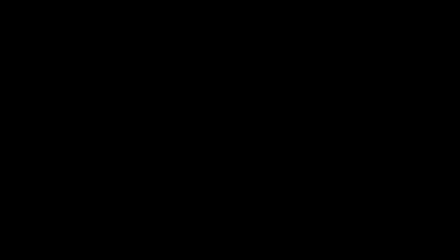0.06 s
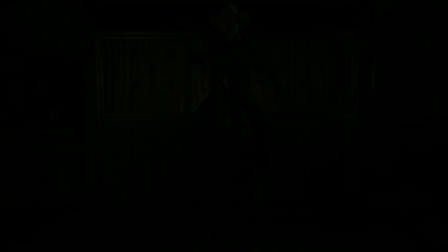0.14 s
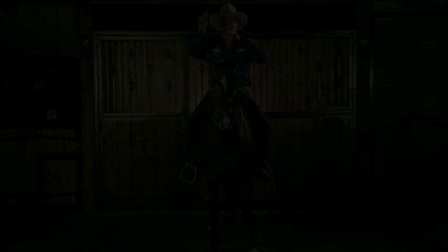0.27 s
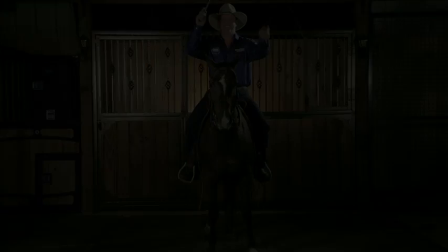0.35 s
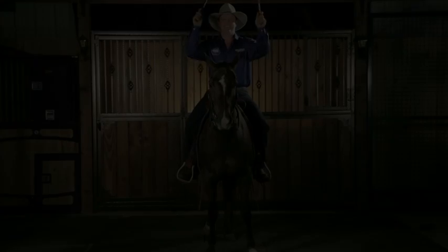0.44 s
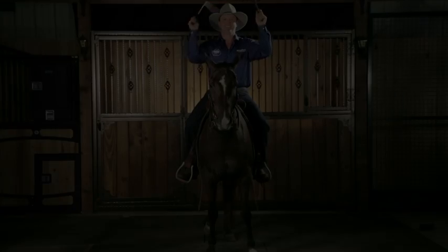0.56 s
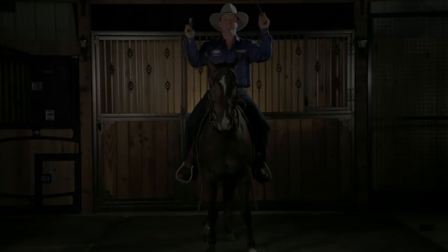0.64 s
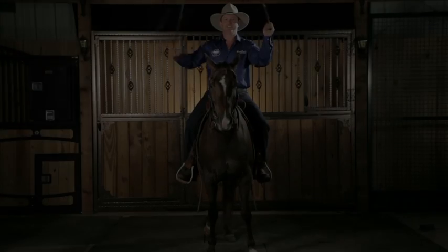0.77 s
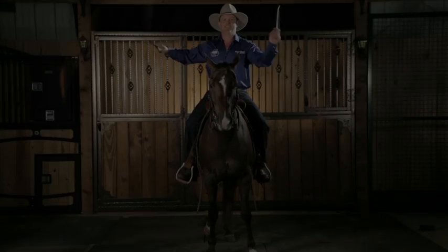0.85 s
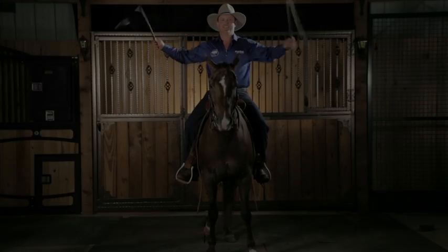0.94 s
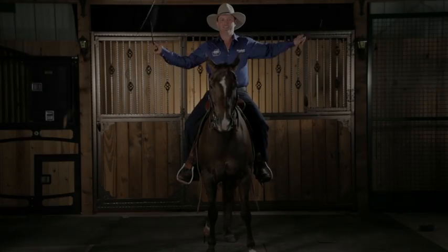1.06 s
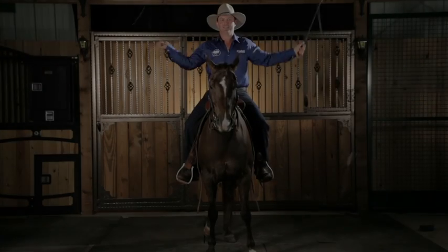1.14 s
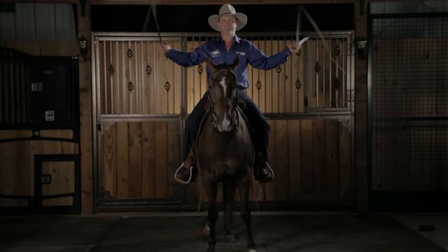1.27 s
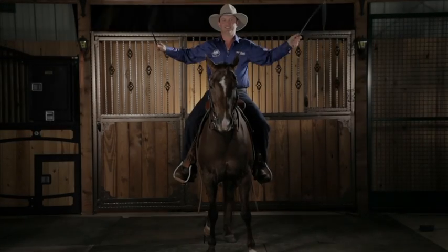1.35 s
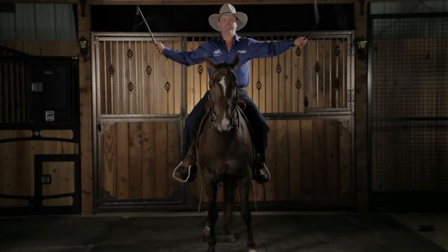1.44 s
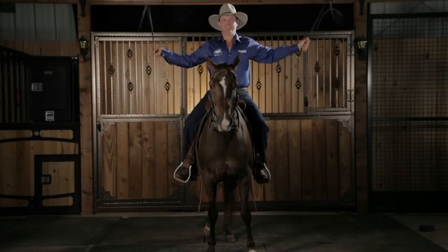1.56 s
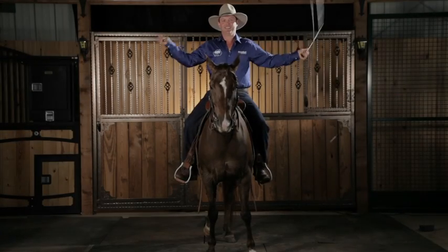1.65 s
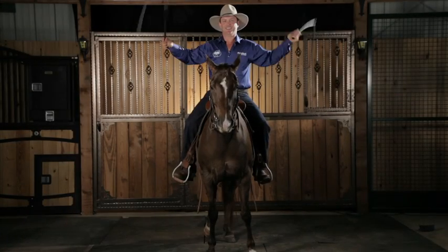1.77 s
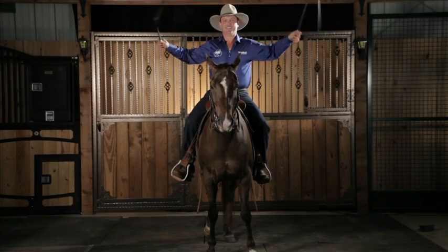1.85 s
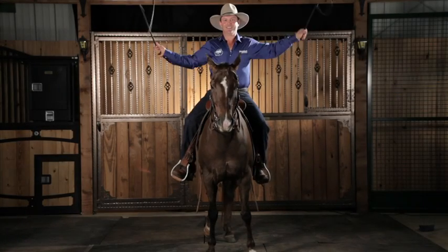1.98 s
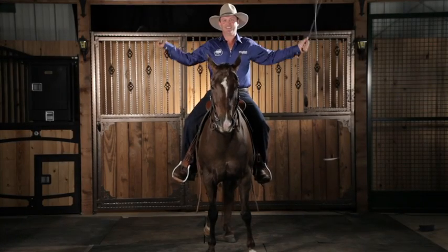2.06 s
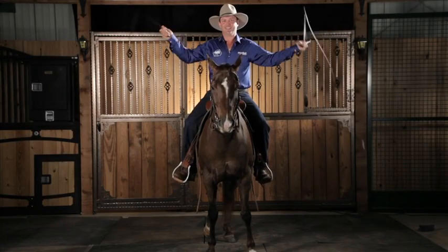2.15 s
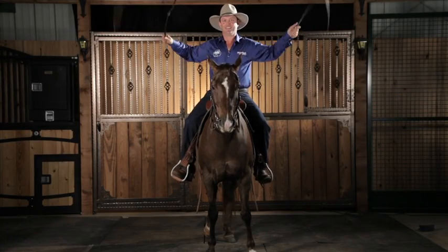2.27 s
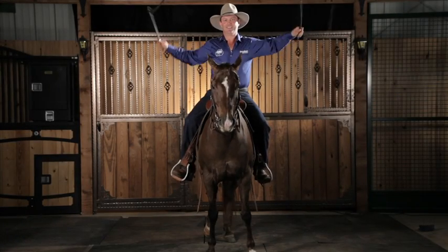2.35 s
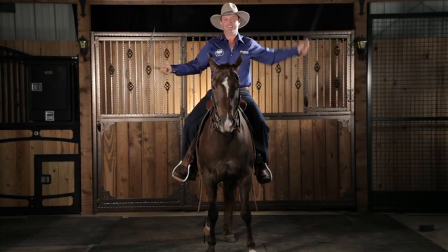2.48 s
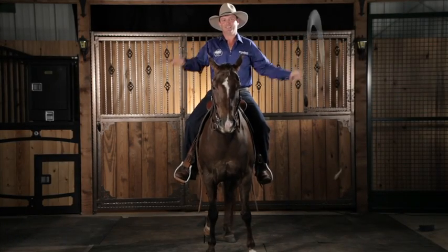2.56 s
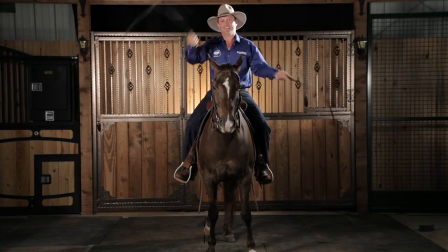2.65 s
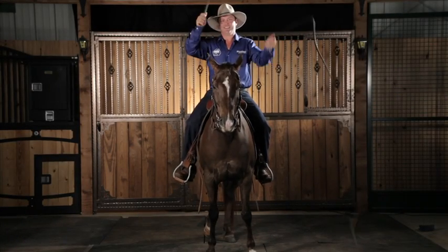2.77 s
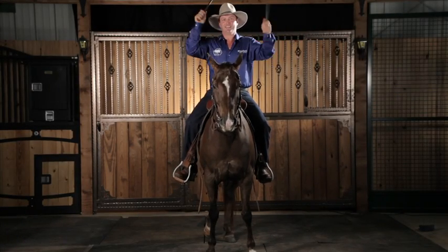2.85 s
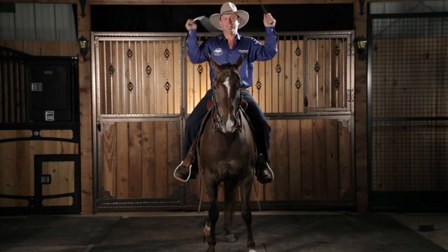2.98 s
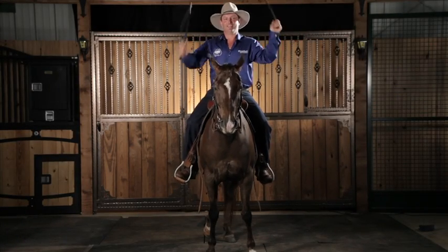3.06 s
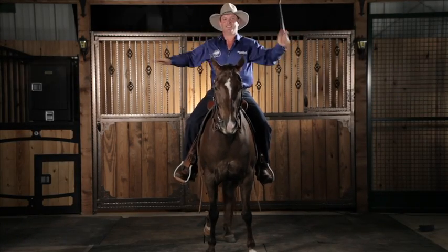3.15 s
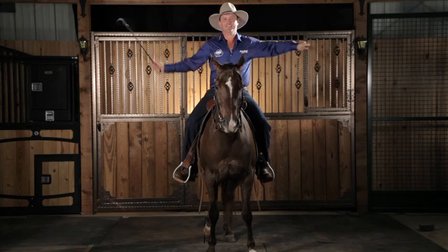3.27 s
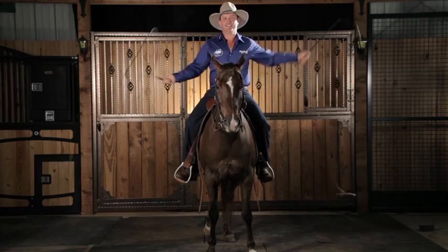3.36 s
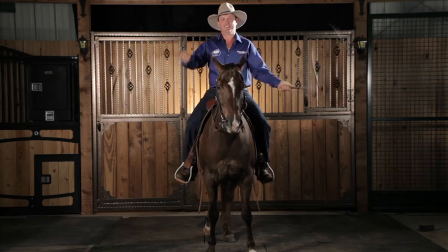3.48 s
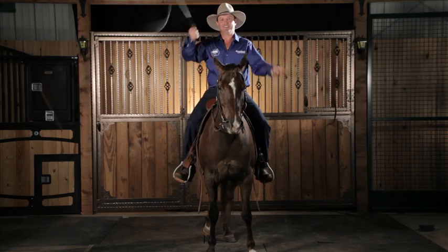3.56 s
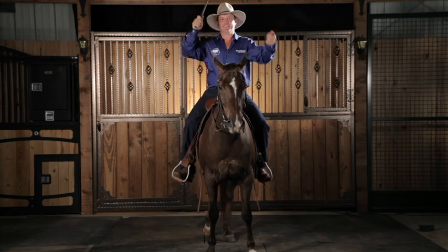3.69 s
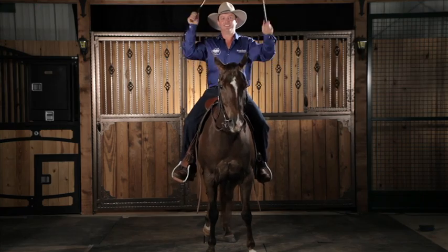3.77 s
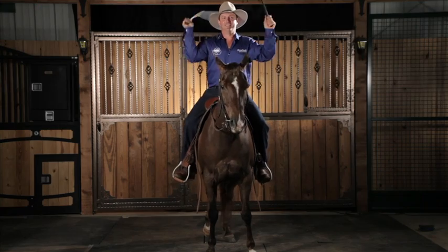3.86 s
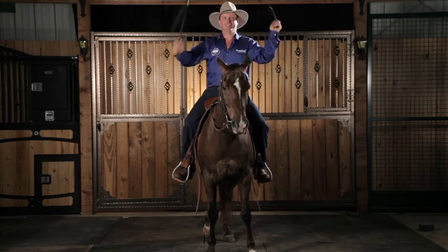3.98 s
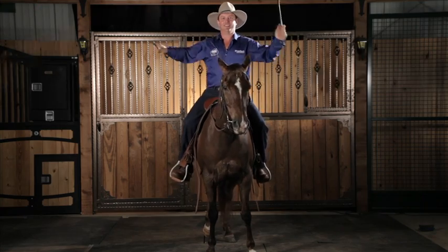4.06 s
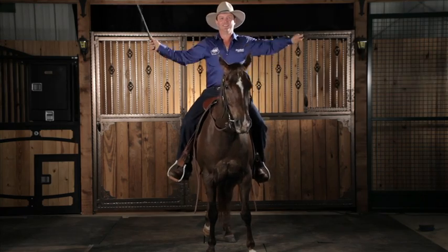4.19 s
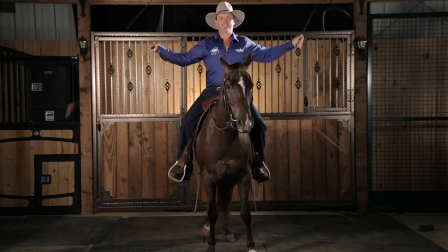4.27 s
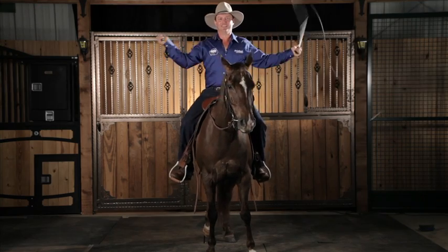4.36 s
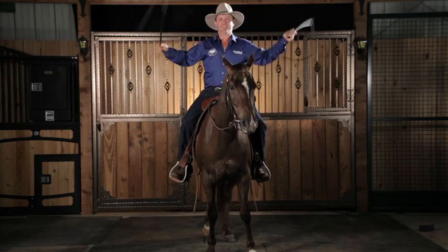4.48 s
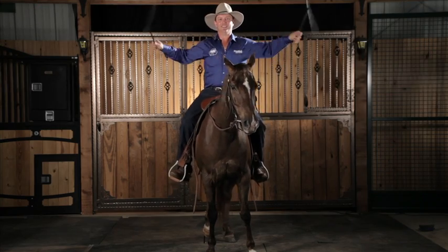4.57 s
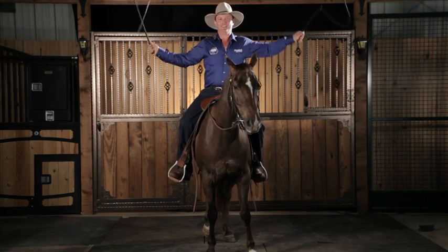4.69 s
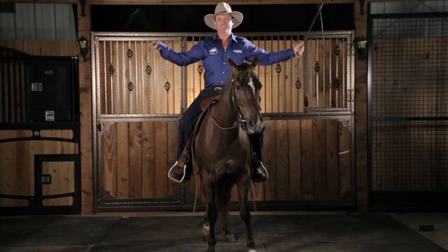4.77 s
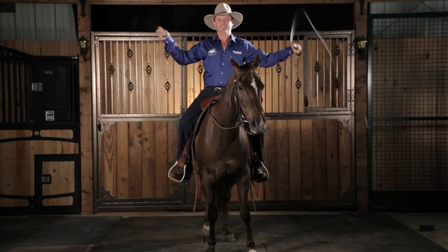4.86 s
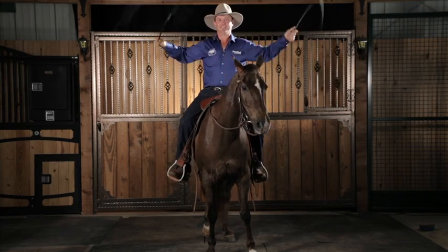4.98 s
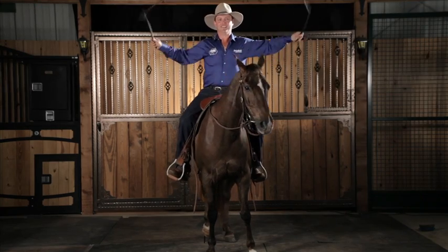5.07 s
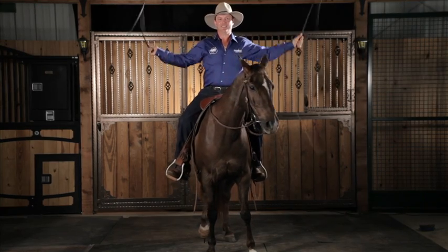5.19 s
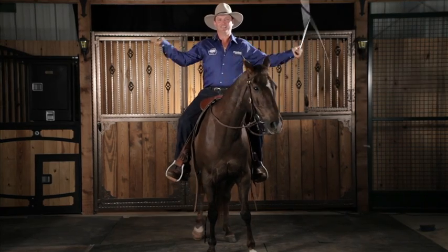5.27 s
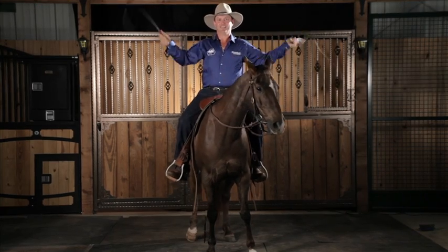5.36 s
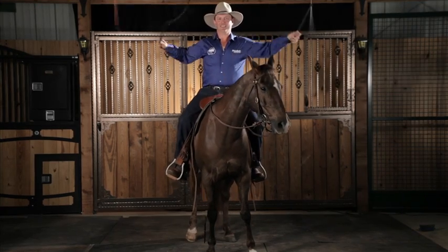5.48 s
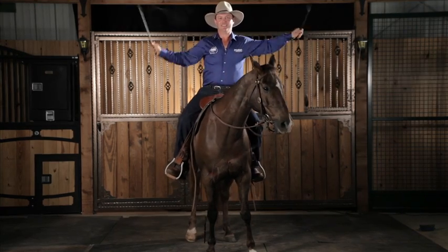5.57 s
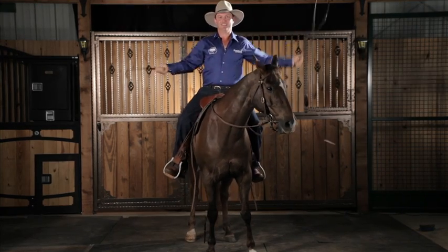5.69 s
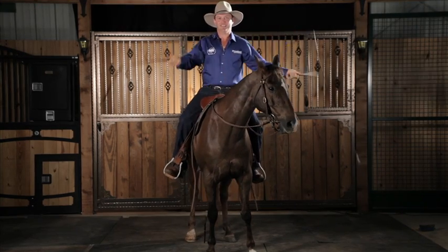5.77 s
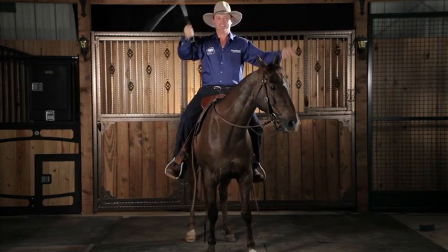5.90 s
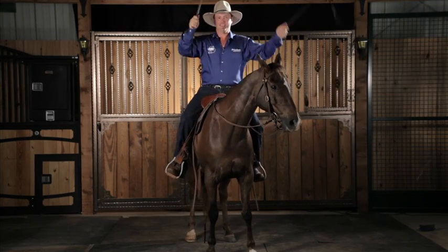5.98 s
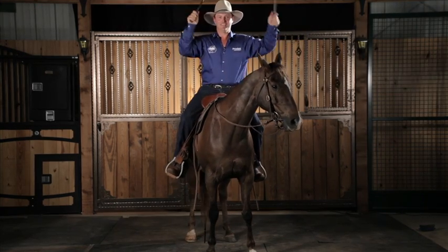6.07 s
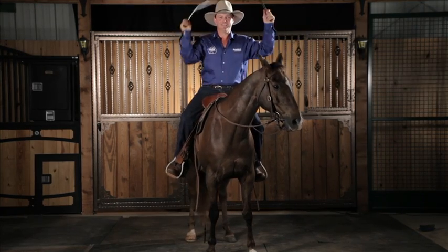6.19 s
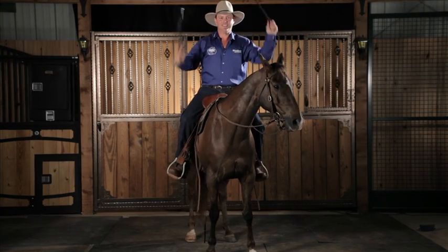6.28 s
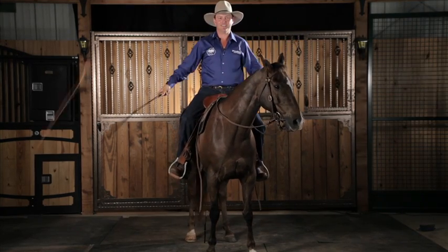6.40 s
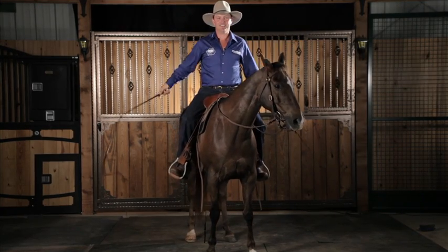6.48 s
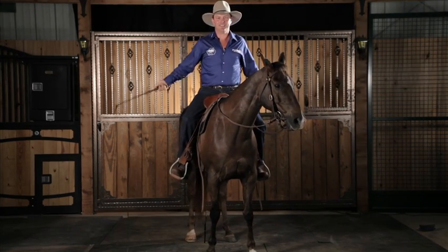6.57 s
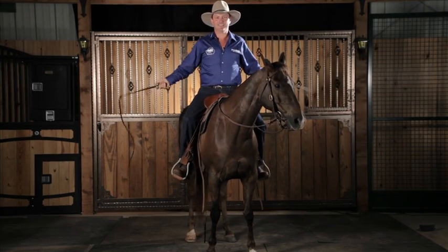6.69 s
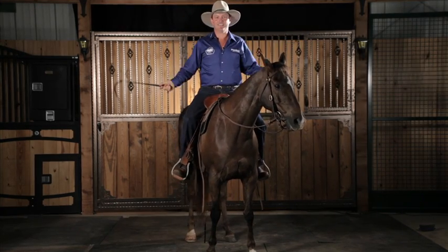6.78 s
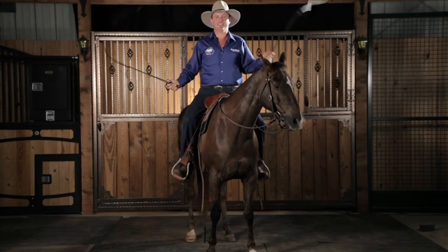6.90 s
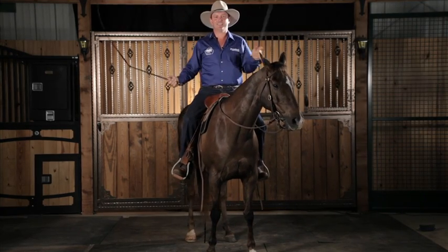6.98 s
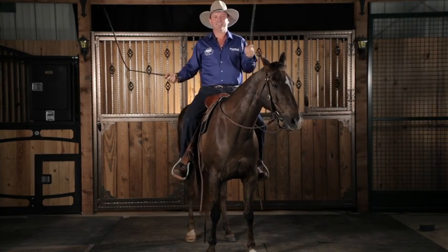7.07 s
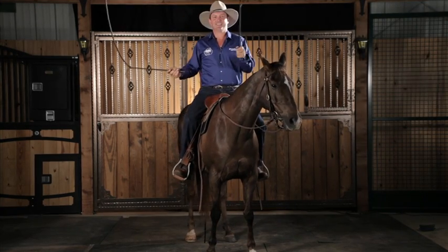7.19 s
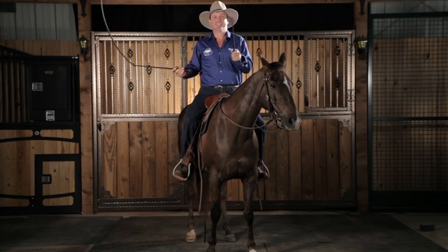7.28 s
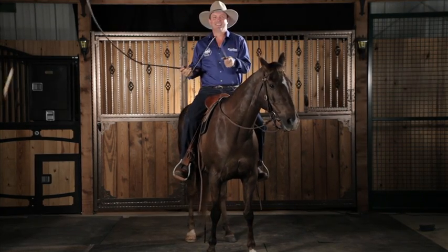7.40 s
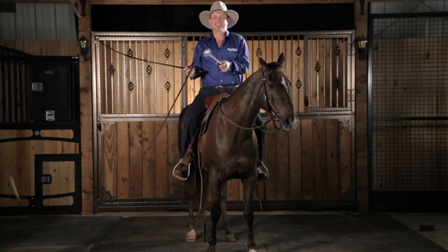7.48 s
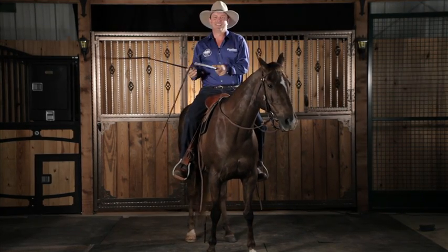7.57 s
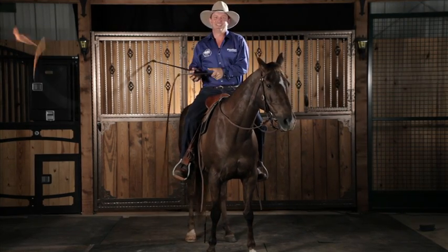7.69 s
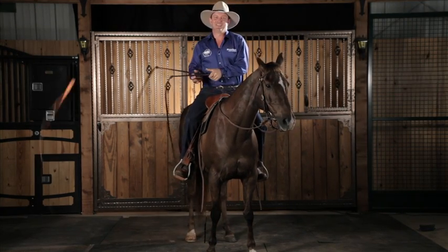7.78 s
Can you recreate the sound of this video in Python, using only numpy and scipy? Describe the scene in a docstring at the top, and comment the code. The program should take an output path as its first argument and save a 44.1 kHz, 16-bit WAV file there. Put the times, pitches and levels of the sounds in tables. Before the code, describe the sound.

Two whips crack in fast flurries inside a barn, with swishing lashes, a short ringing echo and a few dull thuds.

```python
"""Inside a roofed barn yard, one microphone on a rider cracking a pair of stockwhips in fast flurries. Each
lash swishes and its tip breaks the sound barrier in a short snap. The roof is close: its dense burst comes back
some 16 ms behind the direct sound, then the end wall answers and the hall rings on. Around the flurries lashes
and clothes rustle, tack ticks and dull thuds come from the floor, some loud cracks carry a low whump, all over
the low background of the yard."""
import sys
import numpy as np
from scipy import signal
from scipy.fft import rfft, irfft, next_fast_len
from scipy.io import wavfile
from scipy.ndimage import map_coordinates

SR = 44100
rng = np.random.default_rng(int(sys.argv[2]) if len(sys.argv) > 2 else 0)


def persist_wave(psi):
    """Save psi, clipped to +-1, as 16-bit WAV."""
    counts = np.round(np.clip(psi, -1, 1) * 32767).astype(np.int16)
    wavfile.write(sys.argv[1], SR, np.atleast_2d(counts).T)


N = 345741

# Levels in the tables are relative; each source adds its own gain.
# spectrum of the yard's background: frequency_hz, level_db
YARD_SPECTRUM = [(15, -31.5), (25, -12), (48, -18.5), (125, -9), (318, -6), (394, -11.5), (462, -10.5),
                 (1150, -18.5), (1310, -17.5), (1580, -23), (15000, -38.5)]
# spectrum of the air around a loosely swung lash: frequency_hz, level_db
SWING_SPECTRUM = [(100, -2.5), (200, 5), (450, 9.5), (1000, 6.5), (2500, -4), (6000, -24.5)]
# spectrum of rustling cloth and leather: frequency_hz, level_db
RUSTLE_SPECTRUM = [(800, -7.5), (2000, 7.5), (5000, -1), (10000, -5), (15000, -14)]
# loose swings before and after the flurries: full_swing_s, hold_s, swing_db, rustle_db
LOOSE_SWINGS = [(0, 0.018, -57.5, -72), (.31, 0.31, -51.5, -59), (0.513, .06, -49.5, -56),
                (0.683, .02, -51.5, -55), (0.878, 0.11, -60.5, -61), (6.34, 0.02, -50.5, -57.5),
                (7.246, 0.14, -60, -68.5), (7.636, .005, -64, -83.5)]
# thin whistles of the swinging lash: start_s, level_db, pitch_hz
LASH_WHISTLES = [(.305, -39, 2420), (.502, -36, 1930), (.503, -37, 2800)]
# small ticks of tack and whip handles: start_s, level_db, centre_hz
TACK_TICKS = [(0.3072, -41, 4000), (0.405, -41, 5000), (0.5455, -40, 3020), (0.7871, -39, 5000),
              (4.111, -20.5, 800), (5.441, -30.5, 6000), (7.6555, -38, 6000), (7.7684, -43.5, 2460),
              (7.79, -47.5, 3510)]
# dull thuds, as of a hoof or a lash on the floor mats, and low whumps under some loud cracks: start_s,
# level_db, pitch_hz
LOW_THUDS = [(0.126, -29, 130), (.316, -28, 170), (.66, -26, 160), (.949, -25.5, 100), (1.437, -6.5, 169),
             (3.249, -16.5, 86), (4.134, -14, 173), (4.326, -8, 145), (6.342, -16, 146.5),
             (6.469, 4.5, 115), (6.579, -10, 118), (6.864, -18, 167), (7.209, -19, 122), (7.44, -34, 100)]
# spectrum of the hall's tail: frequency_hz, level_db
HALL_SPECTRUM = [(30, -26.5), (60, -16), (115, 0.5), (350, 2), (700, 2.5), (1300, 2.5), (2000, 4),
                 (2800, 3), (4000, 1.5), (5500, -2.5), (7500, -9), (10000, -15), (13000, -19.5),
                 (15500, -26.5)]
# time the hall takes to fall by 60 dB: frequency_hz, t60_s
HALL_DECAY = [(60, 0.7), (200, 0.97), (700, 0.93), (1500, 0.96), (3000, 1.056), (5500, 0.88), (9000, 0.74),
              (13000, 0.45), (16000, 0.37)]
# spectrum of the burst off the roof: frequency_hz, level_db
ROOF_SPECTRUM = [(30, -29), (70, 0), (150, -1.5), (350, 2.5), (700, 4.5), (1300, 3.5), (2000, 4), (2800, 1),
                 (4000, -3), (5500, -5.5), (7500, -16), (10000, -19.5), (15000, -32)]
# whip cracks, each a snap straight at the microphone and a shock sent into the barn:
# start_s, snap_db, shock_db, brightness_db_per_octave
WHIP_CRACKS = [(0.949, -16.5, -15.5, 3.5), (1.11, -17, -11, 3), (1.351, -22, -14.5, 3.6),
               (1.386, -32, -18.5, 0.5), (1.57, -16.5, -11, 2.2), (1.693, -17, -15, 4),
               (1.813, -21.5, -14.5, 5.5), (1.914, -16, -25.5, -0.5), (2.019, -18.5, -11, 3),
               (2.169, -19, -14.5, 3.5), (2.274, -23, -24.5, 3.5), (2.367, -22.5, -17.5, 4),
               (2.473, -18, -17, 3.5), (2.505, -36, -30, -14.5), (2.607, -11.5, -11.5, 0.3),
               (2.686, -23.5, -17, 5.5), (3.247, -12.5, -13.5, 2.3), (3.356, -9.5, -7, 2.1),
               (3.473, -16, -13, 4.5), (3.598, -15, -15.5, 3.5), (4.159, -15.5, -11.5, 2.3),
               (4.276, -11.5, -9.5, 2.5), (4.516, -28, -15.5, 4), (4.542, -17.5, -19, 3.5),
               (4.628, -18, -23, 0.5), (4.732, -12, -14.5, 1.5), (4.881, -17, -20, 1.5),
               (4.975, -25, -15.5, 3), (5.097, -17.5, -34.5, -7.5), (5.189, -16.5, -14, 4),
               (5.23, -25, -26.5, 1), (5.347, -18, -24.5, -4.5), (5.555, -16, -24.5, 0.4),
               (5.654, -18.5, -13, 3.5), (5.805, -15, -13, 0.9), (5.883, -17, -13.5, 3),
               (6.471, -13, -8, 1.5), (6.556, -16.5, -9.5, 1.5), (6.611, -23.5, -13.5, 1)]

ROOF_LAG_S, WALL_LAG_S = .016, .039  # up to the roof and back; from roof burst to end wall echo


def amp(db):
    """Decibels to gain."""
    return 10 ** (np.asarray(db) / 20)


def unit(x):
    """x at rms 1."""
    return x / np.sqrt(np.mean(x ** 2) + 1e-20)


def along(points, hz):
    """(Hz, value) points read on a log axis."""
    frequencies, values = np.transpose(points)
    return np.interp(np.log(hz + 1), np.log(frequencies + 1), values)


def clock(seconds):
    """Sample times from zero."""
    return np.arange(int(seconds * SR)) / SR


def filtered(x, gain):
    """x times a gain that depends on frequency."""
    size = next_fast_len(len(x) + SR // 20)
    return irfft(rfft(x, size) * gain(np.fft.rfftfreq(size, 1 / SR)), size)[:len(x)]


def shaped_noise(gain, size):
    """Noise of rms 1, coloured by a gain that depends on frequency."""
    return unit(filtered(rng.standard_normal(size), gain))


def noise(spectrum, size):
    """Noise of rms 1 with a tabled spectrum."""
    return shaped_noise(lambda hz: amp(along(spectrum, hz)), size)


def band(centre_hz, octaves, size):
    """Noise of rms 1 in a bell-shaped band."""
    return shaped_noise(lambda hz: np.exp(-.5 * (np.log2((hz + 1) / centre_hz) / octaves) ** 2), size)


def wobble(rate, size):
    """A smooth random curve with rate knots a second."""
    knots = rng.standard_normal(int(size * rate / SR) + 4)
    return map_coordinates(knots, [np.arange(size) * rate / SR])


def fade(t, rise_s, t60_s):
    """An envelope that rises and then dies away."""
    return (1 - np.exp(-t / rise_s)) * 10 ** (-3 * t / t60_s)


def add(track, start_s, sound):
    """Mix a sound into the track from start_s."""
    start = max(round(start_s * SR), 0)
    track[start:start + len(sound)] += sound[:max(N - start, 0)]


def yard():
    """Room tone: the low, slowly shifting background of the yard."""
    return amp(-59) * noise(YARD_SPECTRUM, N) + amp(-60 + 2 * wobble(11, N)) * band(120, 0.6, N)


def handling(attack_s=.06, release_s=.04):
    """Lashes swing and whistle loosely through the air while cloth and leather rustle and tick."""
    out, now, t = np.zeros(N), np.arange(N) / SR, clock(.25)
    for full_swing_s, hold_s, swing_db, rustle_db in LOOSE_SWINGS:
        build_up = np.exp(-np.maximum(full_swing_s - now, 0) / attack_s)
        die_away = np.exp(-np.maximum(now - full_swing_s - hold_s, 0) / release_s)
        swing = amp(swing_db) * noise(SWING_SPECTRUM, N)
        cloth = noise(RUSTLE_SPECTRUM, N) * amp(3.4 * wobble(400, N) + 2.8 * wobble(35, N))
        out += amp(3.5) * build_up * die_away * (swing + amp(rustle_db) * unit(cloth))
    for start_s, level_db, pitch_hz in LASH_WHISTLES:
        add(out, start_s, amp(level_db) * band(pitch_hz, 0.16, len(t)) * fade(t, 0.0042, 0.086))
    for start_s, level_db, centre_hz in TACK_TICKS:
        add(out, start_s, amp(level_db - 7) * band(centre_hz, 1.0, len(t)) * fade(t, .0002, .016))
    return out


def thuds():
    """A soft blow on the floor, or the low whump under a loud crack, gives a couple of low cycles and a faint
    boom in the hall."""
    out, t = np.zeros(N), clock(.6)
    for start_s, level_db, pitch_hz in LOW_THUDS:
        blow = -np.sin(2 * np.pi * pitch_hz * t) * fade(t, 0.0047, 0.025)
        boom = band(290, 0.96, len(t)) * fade(t, 0.015, 0.42)
        add(out, start_s, amp(level_db) * (amp(1.5) * blow + amp(-25) * boom))
    return out


def scattered_shock(spectrum, size, brightness, shock_db, blur_hz=14000):
    """A shock scattered into noise; its opposed front and rear edges lift one band and notch the next."""
    gap_ms = min(0.13 * amp(0.76 * (shock_db + 12.5)), 0.17)  # a stronger shock is longer
    rear_strength = np.clip(2.03 * gap_ms, 0, .7)  # a longer one has a stronger rear edge

    def gain(hz):
        octaves = np.log2(np.clip(hz, 1800, 11000) / 2800)
        interference = abs(1 - rear_strength * np.exp(-hz / blur_hz - 2j * np.pi * hz * gap_ms / 1000))
        return amp(along(spectrum, hz) + brightness * octaves) * interference
    return shaped_noise(gain, size)


def hall():
    """Every crack fills the hall with its own diffuse tail, whose treble dies first."""
    out, t = np.zeros(N), clock(1.4)
    build_up = 1 - np.exp(-t / 0.014)
    for start_s, _, shock_db, brightness in WHIP_CRACKS:
        diffuse = scattered_shock(HALL_SPECTRUM, len(t), brightness, shock_db)
        hz, age, bins = signal.stft(diffuse, SR, nperseg=256)
        decay = 10 ** (-3 * age / along(HALL_DECAY, hz)[:, None])
        tail = signal.istft(bins * decay, SR, nperseg=256)[1][:len(t)]
        walls = amp(0.38 * wobble(160, len(t)) * np.exp(-t / .3))  # single reflections stand out early
        add(out, start_s + ROOF_LAG_S, amp(shock_db - 2.9) * tail * walls * build_up)
    return out


def roof(rise_s=0.0016, t60_s=0.092, rafter_lead_s=.005, snap_share=0.14):
    """The ribbed roof scatters each shock back as a dense crackling burst; the end wall repeats it."""
    def burst(age):
        return (1 + np.tanh(age / rise_s / 2)) / 2 * amp(-60 * np.maximum(age, 0) / t60_s)

    out, t = np.zeros(N), clock(.2)
    age = t - 0.0054  # zero where the burst reaches half strength
    swell = np.hypot(burst(age), amp(-11) * burst(age - WALL_LAG_S))
    for start_s, snap_db, shock_db, brightness in WHIP_CRACKS:
        facets = unit(amp(2 * wobble(450, len(t))))
        # the burst partly follows the snap, so cracks aimed away swell more slowly
        level = amp(shock_db + 2 + snap_share * (snap_db - shock_db))
        scatter = scattered_shock(ROOF_SPECTRUM, len(t), brightness, shock_db)
        add(out, start_s + ROOF_LAG_S - rafter_lead_s, level * scatter * facets * swell)
    return out


def swishes():
    """The lash speeds up unevenly before each crack, so its shed vortices sound louder and higher."""
    out, t = np.zeros(N), clock(.16)
    left_s = t[::-1]  # time left until the crack
    fade_in = np.minimum(t / 0.017, 1)
    for (crack_s, snap_db, *_), detune in zip(WHIP_CRACKS, rng.standard_normal(len(WHIP_CRACKS))):
        vortex_hz = 1200 * np.exp(0.19 * detune + 0.16 * wobble(60, len(t)) - left_s / 0.16)
        phase = 2 * np.pi * np.cumsum(vortex_hz) / SR
        tone = wobble(700, len(t)) * np.sin(phase) * amp(-35 - 63 * left_s)
        rush = band(220, 1.0, len(t)) * amp(-33.5 - 64 * left_s)
        hiss = band(1900, 1.2, len(t)) * amp(-39 - 150 * left_s)
        flutter = amp(1.5 * wobble(56, len(t)))
        add(out, crack_s - t[-1], amp(snap_db / 2) * (tone + rush + hiss) * flutter * fade_in)
    return out


def shock_wave(u):
    """One swing of pressure, with its trough and peak at u = -1 and 1."""
    return u * np.exp((1 - u ** 2) / 2)


def snaps(slap_db=-4.5):
    """The tip fizzes through the sound barrier and sends out a shock with a low push of air behind it."""
    out, t = np.zeros(N), clock(.08) - .008
    age = np.maximum(t, 0)
    spreads = rng.uniform(.85, 1.15, (len(WHIP_CRACKS), 4))
    for (start_s, snap_db, _, brightness), spread in zip(WHIP_CRACKS, spreads):
        width_s, second_shock_s, tuning, slap_lag_s = spread * (0.00019, 0.0011, 1, 0.0027)
        blast = shock_wave(t / width_s) - .5 * shock_wave((t - second_shock_s) / (2.6 * width_s))
        push = np.sin(2 * np.pi * 210 * tuning * age) * fade(age, 0.00076, 0.087)
        puff = -np.sin(2 * np.pi * 90 * tuning * age) * fade(age, 0.0043, 0.065)  # air the lash drags
        fizz = band(4000, 1.15, len(t)) * np.exp(-abs(t - .0005) / .002)
        tuft = band(1600, 1.0, len(t)) * fade(age, 0.00021, 0.017)  # the frayed tip crackles
        stalls = band(1500, 1.0, len(t)) * fade(age, 0.0033, 0.063)  # scatter off nearby stall fronts
        knock = amp(snap_db) * (amp(0.5) * blast + amp(-13.5) * push + amp(-2) * tuft)
        air = amp(-22.5) * puff + amp(-11 + .8 * brightness) * fizz + amp(-8.5) * stalls
        add(out, start_s + t[0], knock + amp(snap_db) * air)
        # slap-back from the flat of the roof
        add(out, start_s + t[0] + ROOF_LAG_S + slap_lag_s, amp(slap_db) * knock)
    return out


def scene():
    """All sources meet at one microphone, which feeds both channels."""
    mono = swishes() + snaps() + roof() + hall() + thuds() + handling() + yard()
    return np.array([mono, mono])


def record(dry, low_cut_hz=58, ceiling=.72, top_hz=15500):
    """The recorder thins the deep bass, rounds off the highest peaks and keeps nothing above top_hz."""
    low_cut = signal.butter(2, low_cut_hz, "highpass", fs=SR, output="sos")
    thinned = signal.sosfilt(low_cut, dry)
    rounded = thinned / (1 + abs(thinned / ceiling) ** 5) ** (1 / 5)
    return np.array([filtered(channel, lambda hz: hz < top_hz) for channel in rounded])


dry = scene()
out = record(dry)
persist_wave(out)
```